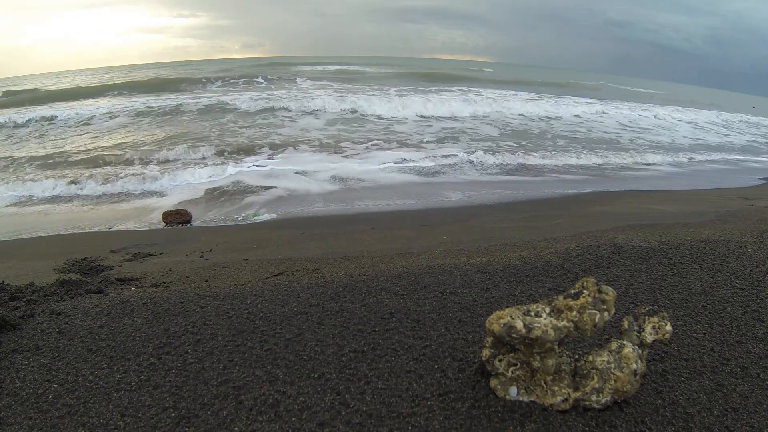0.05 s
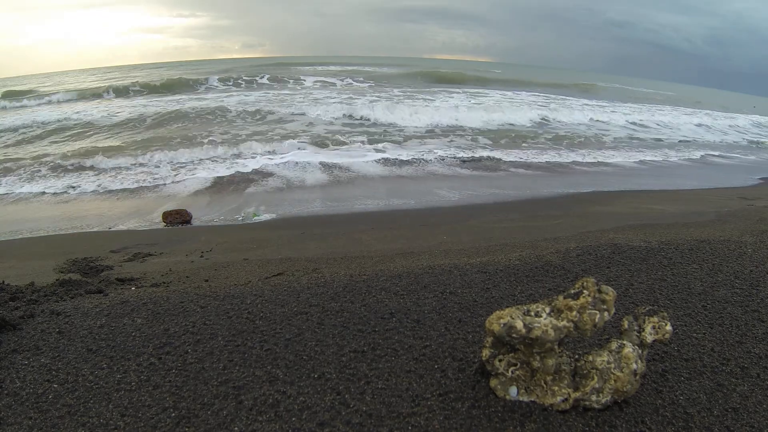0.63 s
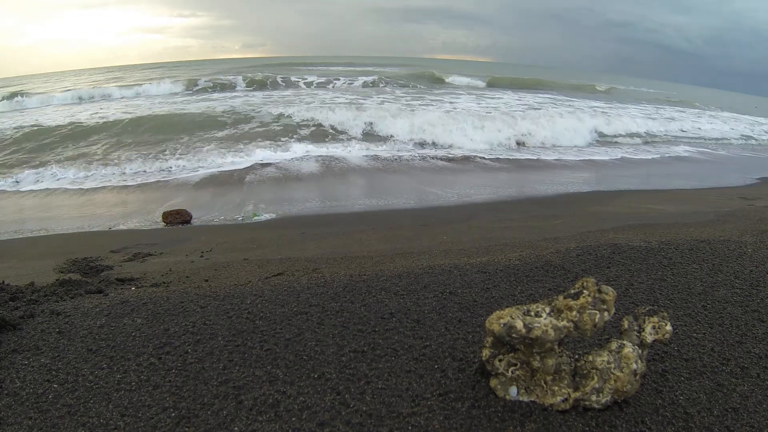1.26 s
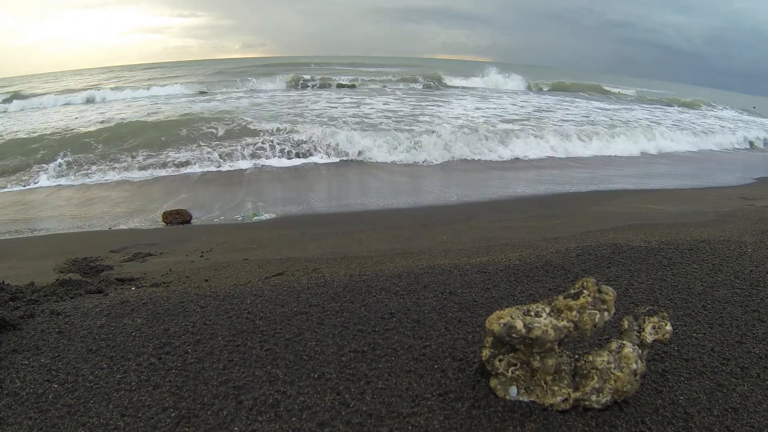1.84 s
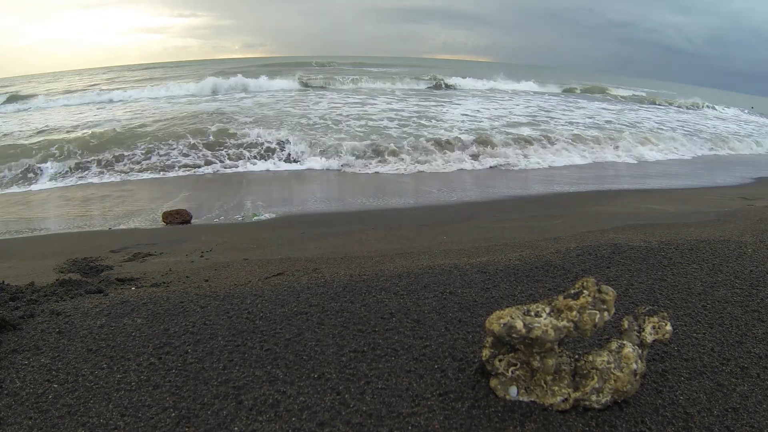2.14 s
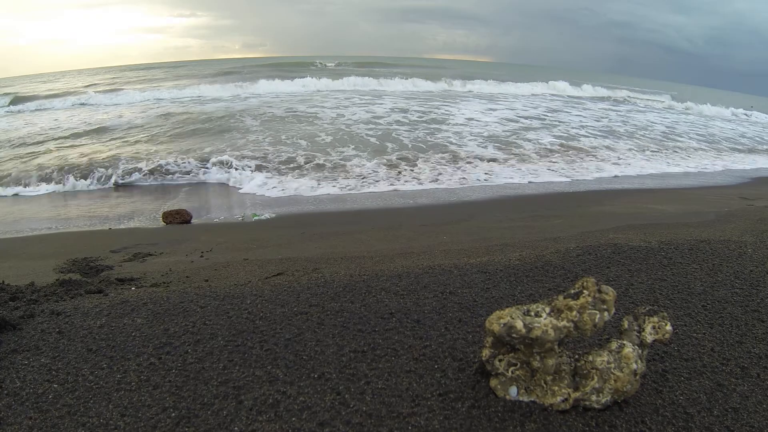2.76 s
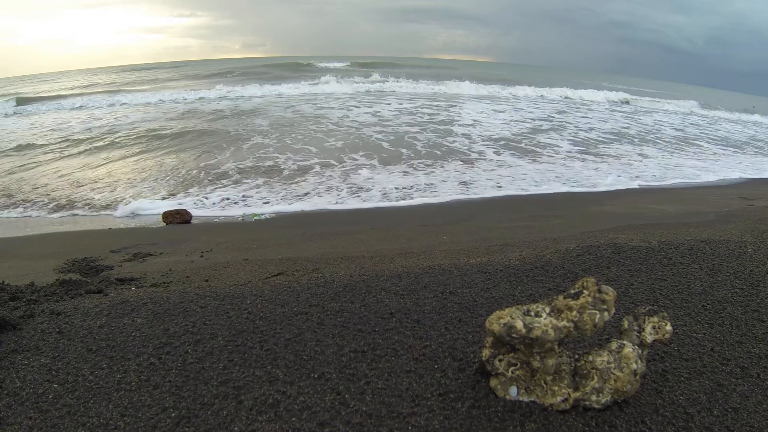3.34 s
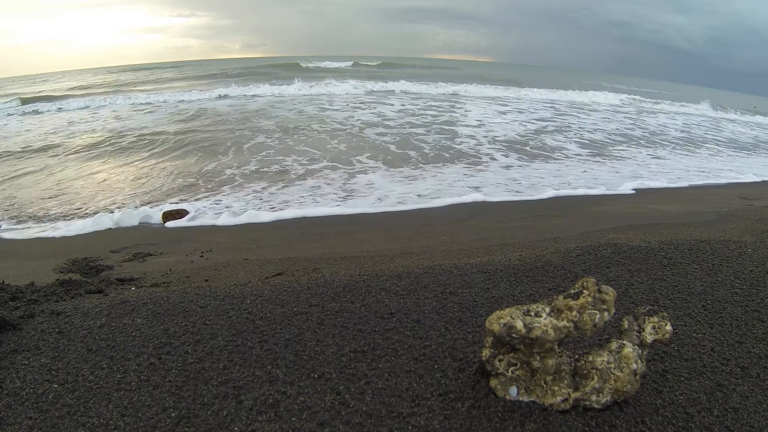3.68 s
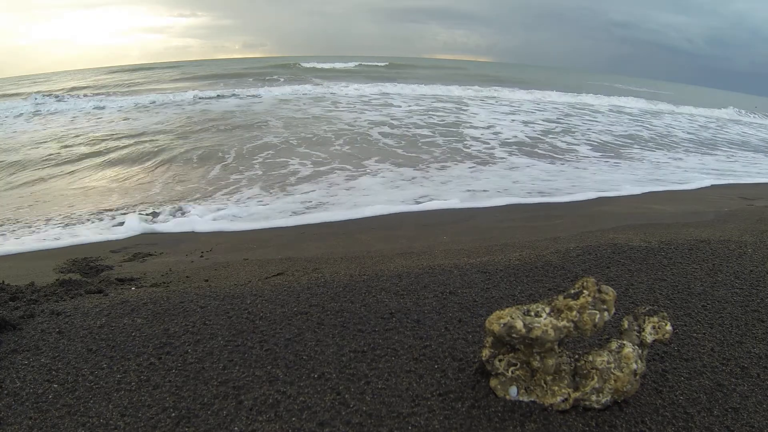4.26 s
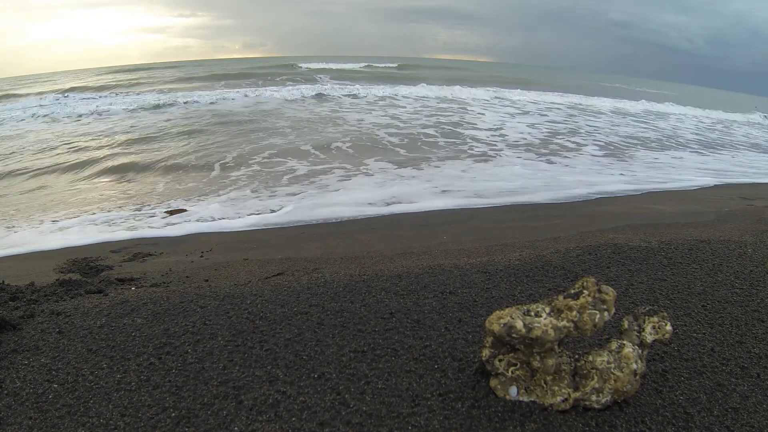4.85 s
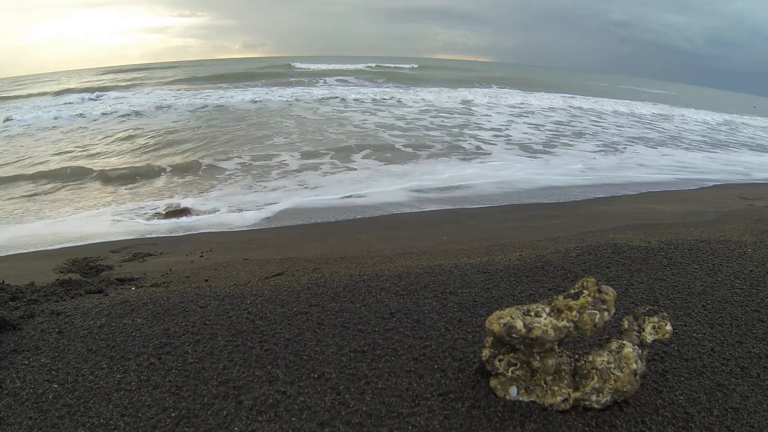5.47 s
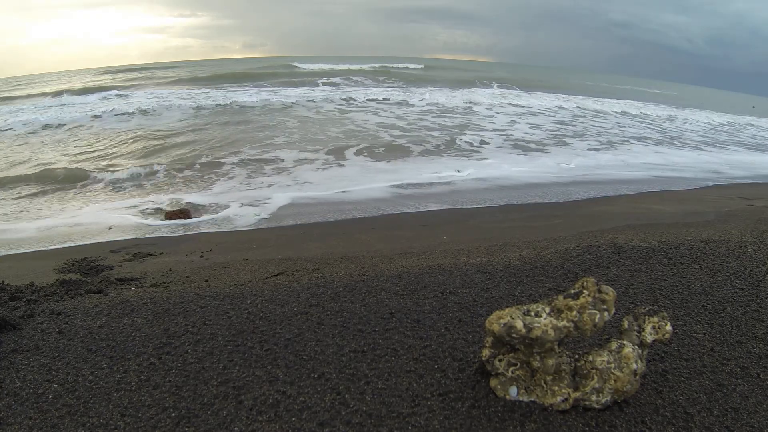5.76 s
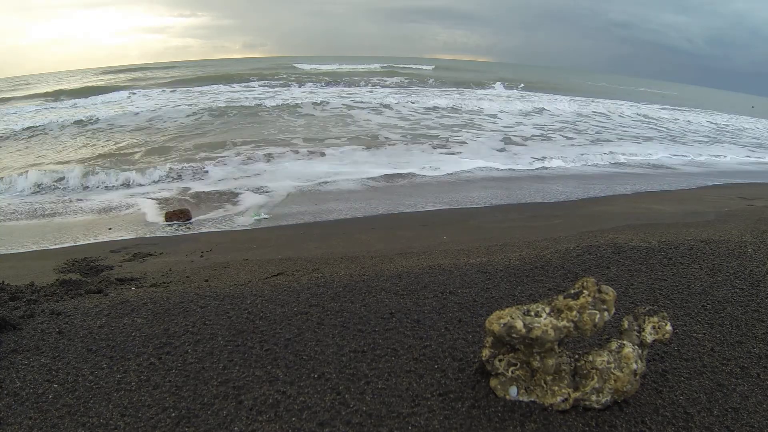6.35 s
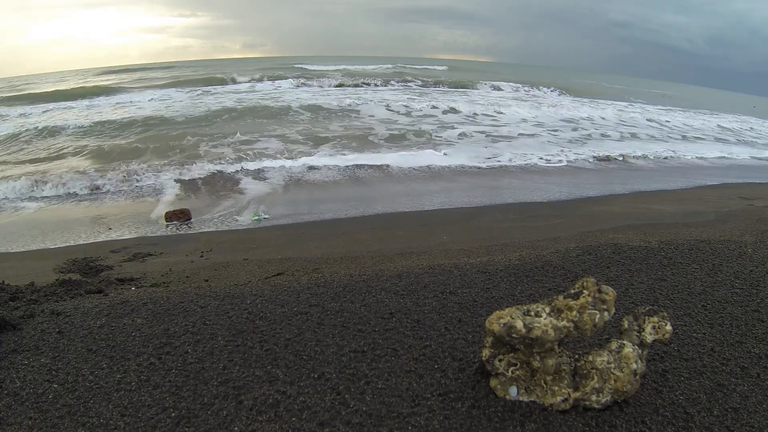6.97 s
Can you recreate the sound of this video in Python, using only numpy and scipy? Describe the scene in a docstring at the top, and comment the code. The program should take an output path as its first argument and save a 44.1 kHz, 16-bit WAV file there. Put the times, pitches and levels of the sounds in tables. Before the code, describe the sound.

A wave tips over along a sand beach and breaks nearby, splashing, thudding softly and throwing a hiss of spray. The water settles into a quieter foamy wash with a dull rush of distant surf, before a few bubbles plop and a second, smaller wave splashes at the water's edge. A deep sea roar continues underneath, and light wind buffets the microphone in short, low gusts throughout.

```python
"""A low roar and a steady wash of surf on a sand beach, with light wind buffeting the microphone.
A wave spills further along the shore, collapses close by and runs up as fizzing foam; a smaller one
follows. Large clouds of trapped air throb to make the roar and thuds, while single bubbles ring as
damped oscillators in the splashes, spray and plops. The camera housing colours the treble,
and the electronics hiss and whine faintly."""
import sys
import numpy as np
from scipy import signal
from scipy.fft import rfft, irfft, next_fast_len
from scipy.io import wavfile
from scipy.ndimage import uniform_filter1d, map_coordinates

SR = 44100
rng = np.random.default_rng(int(sys.argv[2]) if len(sys.argv) > 2 else 0)


def wrap_up_sound(samples):
    """Save the sound to the file named by the first command line argument, as 16-bit audio."""
    columns = np.atleast_2d(samples).T
    # keep every value between -1 and 1, then stretch to whole-number steps
    tamed = np.clip(columns, -1, 1)
    steps = np.round(tamed * 32767).astype(np.int16)
    wavfile.write(sys.argv[1], SR, steps)


N = 318402


def amp(db):
    """Amplitude ratio of a level in decibels."""
    return 10 ** (np.asarray(db) / 20)


def unit(x):
    """Normalisation to an rms of 1."""
    return x / np.sqrt(np.mean(x ** 2) + 1e-20)


def curve(rows):
    """Linear interpolation of (seconds, value) rows to one value per sample."""
    return np.interp(np.arange(N) / SR, *np.transpose(rows))


def wobble(rate):
    """Smooth random modulation: a spline through `rate` Gaussian knots a second."""
    knots = rng.standard_normal(int(N * rate / SR) + 4)
    return map_coordinates(knots, [np.arange(N) * rate / SR])


def filtered(x, response):
    """Zero-phase filtering: the spectrum of x is multiplied by a function of frequency."""
    size = next_fast_len(N + SR // 2)
    return irfft(rfft(x, size) * response(np.fft.rfftfreq(size, 1 / SR)), size)[:N]


def coloured(x, points):
    """Spectral shaping by (Hz, dB) points, rolling off beyond both ends; rms 1."""
    hz, db = np.transpose(points)
    hz = np.r_[hz[0] / 3, hz, hz[-1] * 4]
    db = np.r_[db[0] - 40, db, db[-1] - 60]
    return unit(filtered(x, lambda f: amp(np.interp(np.log(f + 1e-9), np.log(hz), db))))


def churn(patchy_db):
    """Modulated white noise whose level drifts in patches of time and frequency; rms 1."""
    spectrogram = signal.stft(rng.standard_normal(N), nperseg=512)[2]
    patches = uniform_filter1d(rng.standard_normal(spectrogram.shape), size=5, axis=0)
    patches = uniform_filter1d(patches, size=14, axis=1)
    return unit(signal.istft(spectrogram * amp(patchy_db * unit(patches)), nperseg=512)[1][:N])


def bubbles(count, low_hz, high_hz, t60_cycles, scatter_db):
    """Bubble resonance: damped sines, each rising a little in pitch as it nears the surface; rms 1."""
    when, pitch, strength = rng.random((count, 3)).T[:, :, None]
    hz = low_hz + (high_hz - low_hz) * pitch
    step = np.arange(256)
    cycles = hz * step / SR
    age = cycles / t60_cycles
    gain = amp(-scatter_db * np.log(np.clip(strength, .05, 1))) * hz / high_hz
    glide = 1 + 0.074 * np.minimum(age, 1)
    rings = gain * np.exp(-np.log(1000) * age) * np.sin(2 * np.pi * cycles * glide)
    positions = (when * N).astype(int) + step
    return unit(np.bincount(positions.ravel(), rings.ravel(), N)[:N])


def swells(rows, bed_db=-np.inf, roundness=1.67):
    """Power summation of swells over a bed; each is 10 dB down one rise before and one fall after its peak."""
    t, power = np.arange(N) / SR, amp(bed_db) ** 2
    for peak_s, db, rise, fall in rows:
        away = np.maximum((peak_s - t) / rise, (t - peak_s) / fall)
        power = power + amp(db - 10 * np.abs(away) ** roundness) ** 2
    return np.sqrt(power)


def bursts(rows, rise_share, bed_db=-np.inf):
    """Envelope of swells that each spend the same share of their length rising."""
    shaped = [(s, db, rise_share * length, (1 - rise_share) * length) for s, db, length in rows]
    return swells(shaped, bed_db)


# The surge as waves build, collapse and drain. Each row: time in seconds, level in dB.
ROAR_SURGE = [(0, -47.5), (.9, -44.5), (1.3, -40), (2.0, -41.5), (2.2, -43.5), (2.9, -39.5), (3.4, -45.5),
              (4.1, -45.5), (4.35, -49), (4.55, -45.5), (5.7, -50.5), (6.0, -47.5), (6.3, -49.5),
              (6.7, -47), (7.0, -54), (7.22, -46.5)]
# Spectrum of the roar. Each row: frequency in Hz, relative level in dB.
ROAR_SPECTRUM = [(30, -2.5), (60, -0.5), (130, -1.1), (175, -4), (240, -10.5), (340, -16), (500, -25),
                 (700, -36.5), (1500, -60.5)]


def roar():
    """Collective oscillation: big air clouds throb with the surge; smaller ones follow it more evenly."""
    surge_db = curve(ROAR_SURGE)
    smooth_db = uniform_filter1d(surge_db, size=SR)
    steady_db = smooth_db.mean() + 0.68 * (smooth_db - smooth_db.mean())
    noise = coloured(rng.standard_normal(N), ROAR_SPECTRUM)
    deep = filtered(noise, lambda f: 1 / (1 + (f / 210) ** 4))
    big_clouds = amp(surge_db + 0.78 + 0.77 * wobble(17)) * deep
    small_clouds = amp(steady_db + 0.8 + 0.18 * wobble(12)) * (noise - deep)
    return big_clouds + small_clouds


# Gusts on the microphone. Each row: peak time in seconds, peak level in dB, length in seconds.
WIND_GUSTS = [(.18, -40, 0.081), (.36, -43.5, 0.17), (.53, -30.5, 0.1), (.74, -35, 0.16), (.87, -38, 0.11),
              (1.18, -34.5, 0.061), (1.56, -35, 0.33), (1.92, -39, 0.075), (2.09, -38, 0.17),
              (2.42, -36, 0.23), (2.66, -38, 0.061), (2.79, -40, 0.092), (3.56, -41, 0.1),
              (3.74, -36.5, 0.12), (4.22, -42.5, 0.16), (4.8, -37.5, 0.2), (4.9, -42, .08),
              (5.26, -38, 0.083), (5.51, -39, .08), (5.64, -35.5, 0.25), (6.01, -32, 0.1),
              (6.46, -39, 0.23), (6.75, -47, 0.26), (7.17, -38, 0.066)]
# Spectrum of the eddies. Each row: frequency in Hz, relative level in dB.
EDDY_SPECTRUM = [(4, -8.5), (11, -3), (20, 4.5), (29, -11), (42, -12), (65, -22), (150, -56)]


def wind(start_db=-46.5, trend_db_per_s=-0.25):
    """Turbulent pressure: eddies push on the microphone, in gusts over a slackening breeze."""
    eddies = signal.hilbert(coloured(rng.standard_normal(N), EDDY_SPECTRUM))
    envelope = np.sqrt(np.abs(uniform_filter1d(np.abs(eddies) ** 2, size=6000)) + 1e-6)
    even_eddies = unit(eddies.real / envelope)
    breeze_db = start_db + trend_db_per_s * np.arange(N) / SR - 0.3 * wobble(4.2)
    return bursts(WIND_GUSTS, rise_share=0.48, bed_db=breeze_db) * even_eddies


# The wash of the whole surf zone. Each row: time in seconds, level in dB.
WASH_LEVEL = [(0, -63.5), (2.2, -61.5), (3.6, -66), (4.5, -66.5), (5.5, -67), (7.22, -66)]
# Spectrum of the wash. Each row: frequency in Hz, relative level in dB.
WASH_SPECTRUM = [(300, 1), (600, -11), (800, -6), (1100, -5.5), (1400, -8.5), (1900, -14.5), (3000, -17),
                 (4000, -22), (5500, -26), (7500, -34), (10000, -31), (14000, -43.5)]


def wash():
    """Incoherent summation: distant white water merges into a rush, with foam fizzing on the sand."""
    foam = bubbles(count=9000, low_hz=1500, high_hz=10700, t60_cycles=4.9, scatter_db=3.5)
    envelope = amp(curve(WASH_LEVEL) + 0.087 * wobble(3.7))
    return envelope * coloured(churn(patchy_db=1.1) + amp(-9) * foam, WASH_SPECTRUM)


# Tones of the electronic whine. Each row: frequency in Hz, rms level in dB.
WHINE_TONES = [(9807, -99), (9830, -99)]
# Spectrum of the electronic hiss. Each row: frequency in Hz, relative level in dB.
HISS_SPECTRUM = [(3000, 3), (7500, -3.5), (9200, -3.5), (9830, 4), (10400, -4), (11500, -6), (13000, -8),
                 (14000, -13)]


def electronics(drift_hz=3, hiss_db=-80.5):
    """Self-noise: the circuits add a faint hiss and a thin, slightly unsteady whine."""
    whine = np.zeros(N)
    for hz, db in WHINE_TONES:
        phase = 2 * np.pi * np.cumsum(hz + drift_hz * wobble(18)) / SR
        whine += amp(db) * unit(np.sin(phase))
    return whine + amp(hiss_db) * coloured(rng.standard_normal(N), HISS_SPECTRUM)


# Crests collapsing at the water's edge.
# Each row: peak time in seconds, level in dB before the treble gain, rise and fall in seconds.
NEAR_CRESTS = [(.05, -62, 0.31, 0.26), (.68, -62.5, 0.61, 0.63), (1.98, -62, 1.0, 0.8),
               (2.28, -64, 0.47, 0.16), (2.71, -57.5, 0.5, 0.58), (3.15, -70, .15, .22),
               (6.07, -67, 0.36, 0.45), (6.48, -65, 0.32, 0.24), (6.83, -65.5, 0.4, 0.25)]
# Their spectrum, notched near 2 kHz by the echo off the sand.
# Each row: frequency in Hz, relative level in dB.
BREAKER_SPECTRUM = [(500, -22.5), (800, -19.5), (1100, -3), (1300, -1.5), (1650, -1), (1900, -11),
                    (2100, -17.5), (2450, -9), (2800, -12.5), (3200, -15.5), (3700, -24), (5000, -35),
                    (9000, -37.5), (14000, -57)]
# Brightness with the nearness of the foam front. Each row: time in seconds, treble gain in dB.
TREBLE_GAIN = [(0, -3), (1, -6.5), (1.3, -2), (1.9, -1.5), (2.3, -0.8), (2.5, -1.3), (2.95, 0.1),
               (6.45, -3.5), (7.22, 2.8)]


def breakers(lapping_db=-77.5):
    """Air entrainment: each crest beats bubbles into the water and sounds brighter when nearer."""
    splash = bubbles(count=18000, low_hz=788, high_hz=8300, t60_cycles=17, scatter_db=4.5)
    water = coloured(churn(patchy_db=0.55) + amp(-7.5) * splash, BREAKER_SPECTRUM)
    treble = filtered(water, lambda f: 1 - 1 / (1 + (f / 1900) ** 8))
    shelved = water + (amp(curve(TREBLE_GAIN)) - 1) * treble
    return swells(NEAR_CRESTS, lapping_db) * amp(0.28 * wobble(20)) * shelved


# Lips of water landing. Each row: peak time in seconds, peak level in dB, rise and fall in seconds.
LIP_IMPACTS = [(.56, -69, .06, .12), (.95, -71, .15, .15), (2.62, -62.5, .1, .12), (2.8, -65, .08, 0.14),
               (6.355, -62, .06, .07), (6.44, -61.5, .055, 0.12), (6.62, -66, 0.086, 0.14),
               (6.84, -68, 0.08, .12)]
# Spectrum of a slap. Each row: frequency in Hz, relative level in dB.
SLAP_SPECTRUM = [(750, -24), (1100, 2.5), (1320, 6), (1480, -7), (1660, 1.5), (1900, -23), (2200, -9),
                 (2430, -6.5), (2800, -10.5), (3400, -25), (6000, -34)]


def slaps():
    """Impact on water: a curling lip hits the shallows in a quick splash of coarse, gurgling bubbles."""
    gurgle = bubbles(count=7000, low_hz=980, high_hz=2800, t60_cycles=14, scatter_db=4)
    return swells(LIP_IMPACTS) * coloured(churn(patchy_db=2) + amp(-5) * gurgle, SLAP_SPECTRUM)


# Falls of spray. Each row: peak time in seconds, peak level in dB, rise and fall in seconds.
SPRAY_FALLS = [(1.03, -79, .22, 0.35), (1.86, -75, 0.17, 0.29), (2.24, -80, 0.13, .25),
               (2.83, -79, 0.18, .42)]
# Spectrum of falling spray. Each row: frequency in Hz, relative level in dB.
SHOWER_SPECTRUM = [(2000, -17), (3150, 5), (4100, -1), (4600, 3), (5500, -7), (6150, -3.5), (7600, -16),
                   (8400, -11), (12000, -22)]


def showers():
    """Drop impact noise: spray thrown up by a crest rains back on the water as a bright sizzle."""
    drops = bubbles(count=16000, low_hz=2800, high_hz=9000, t60_cycles=4, scatter_db=2)
    return swells(SPRAY_FALLS) * coloured(churn(patchy_db=1) + amp(-10) * drops, SHOWER_SPECTRUM)


# Surf lines far out. Each row: peak time in seconds, peak level in dB, rise and fall in seconds.
DISTANT_ROLLERS = [(1.4, -64.5, 0.57, 0.33), (4.25, -66.5, 1, 0.94)]
# Spectrum of distant surf. Each row: frequency in Hz, relative level in dB.
ROLLER_SPECTRUM = [(170, 1), (450, 5.5), (800, -6), (1250, -1), (2000, -31)]


def far_surf(open_sea_db=-85):
    """Treble loss with distance: far rollers arrive as a dull rush with no spray in it."""
    return swells(DISTANT_ROLLERS, open_sea_db) * coloured(churn(patchy_db=2.5), ROLLER_SPECTRUM)


# Spills along the shore. Each row: peak time in seconds, peak level in dB, rise and fall in seconds.
SPILLING_CRESTS = [(1.19, -64.5, 0.2, 0.24), (1.49, -64.5, 0.23, 0.28), (1.82, -62.5, 0.17, 0.26)]
# Spectrum of a spill. Each row: frequency in Hz, relative level in dB.
SPILL_SPECTRUM = [(400, -7), (700, -3.5), (1200, -5.5), (1600, -0.5), (2000, 1.5), (2600, -7.5),
                  (3300, -14), (3800, -15), (4800, -17), (7500, -32), (9000, -31), (14000, -42)]


def spill(far_spray_db=-80):
    """Spilling breaker: a stretch of crest tips over further along and throws bright spray."""
    envelope = swells(SPILLING_CRESTS, far_spray_db) * amp(0.28 * wobble(18))
    return envelope * coloured(churn(patchy_db=1.6), SPILL_SPECTRUM)


# Masses of water falling within the roar.
# Each row: peak time in seconds, peak level in dB, length in seconds, centre frequency in Hz.
FALLING_MASSES = [(1.226, -46, 0.069, 94.5), (1.48, -42, 0.33, 95), (1.863, -48, 0.17, 171),
                  (2.084, -41, 0.14, 91), (2.375, -41, 0.27, 99), (2.65, -44.5, 0.25, 157),
                  (2.854, -38, 0.18, 103), (2.92, -49, 0.24, 215), (3.276, -45, 0.22, 120),
                  (3.913, -46.5, 0.24, 102), (7.175, -42, 0.096, 93)]


def thuds(band_ratio=1.508):
    """Cloud resonance: each falling mass traps a cloud of air, which throbs deeper the bigger it is."""
    out, noise = np.zeros(N), rng.standard_normal(N)
    for peak_s, db, length, hz in FALLING_MASSES:
        band = signal.butter(3, [hz / band_ratio, hz * band_ratio], btype="band", fs=SR, output="sos")
        out += bursts([(peak_s, db, length)], rise_share=0.66) * unit(signal.sosfilt(band, noise))
    return out


# Air pockets closing in the shallows. Each row: start in seconds, pitch in Hz, peak level in dB.
AIR_POCKETS = [(4.193, 1060, -58.5), (5.645, 1030, -54), (5.671, 1600, -61), (5.996, 1490, -56),
               (6.016, 1100, -57), (6.023, 1300, -61), (6.400, 1230, -52), (6.417, 1610, -53)]


def plops(t60_s=0.016, attack_s=0.0018, glide_per_s=14):
    """Bubble resonance: each pocket pinches off one big bubble, whose pitch climbs near the surface."""
    out, t = np.zeros(N + SR), np.arange(SR // 16) / SR
    envelope = (1 - np.exp(-t / attack_s)) * np.exp(-np.log(1000) * t / t60_s)
    envelope /= envelope.max()
    for start, hz, db in AIR_POCKETS:
        chirp = np.sin(2 * np.pi * hz * t * (1 + glide_per_s * t / 2))
        out[round(start * SR):][:len(t)] += amp(db) * envelope * chirp
    return out[:N]


def scene():
    """Superposition: the pressures of sea and wind add at one microphone."""
    background = roar() + wind() + wash()
    waves = breakers() + slaps() + showers() + far_surf() + spill() + thuds() + plops()
    return (background + waves)[None]


# Resonances of the camera housing. Each row: centre in Hz, Gaussian width in Hz, boost in dB.
HOUSING_RESONANCES = [(2427, 99, 3), (3210, 91, 2), (4570, 98, 5.5), (4940, 185, 4.5), (6120, 230, 5),
                      (6890, 360, 4), (8360, 260, 3.5), (9230, 200, 5.5)]


def housing_gain(f):
    """Enclosure resonance: the housing lifts a few narrow treble bands."""
    return amp(sum(db * np.exp(-.5 * ((f - hz) / width) ** 2) for hz, width, db in HOUSING_RESONANCES))


def record(dry, top_hz=14400):
    """Band limiting: the camera cuts the top off the housing's sound and off its own noise."""
    inside = filtered(dry[0], housing_gain) + electronics()
    return filtered(inside, lambda f: f < top_hz)[None]


dry = scene()
out = record(dry)
wrap_up_sound(out)
```